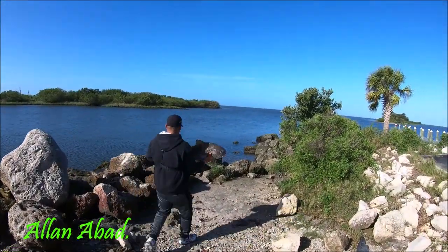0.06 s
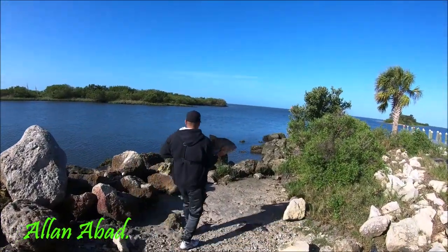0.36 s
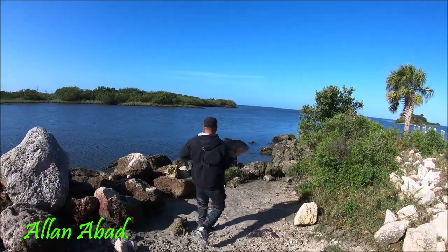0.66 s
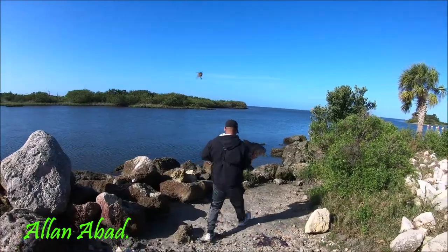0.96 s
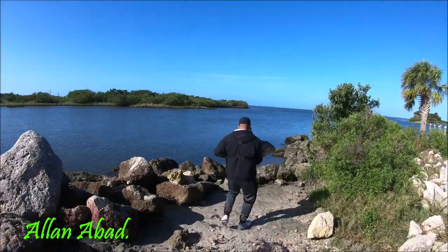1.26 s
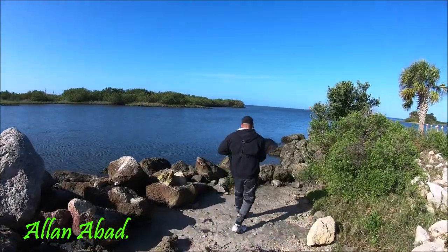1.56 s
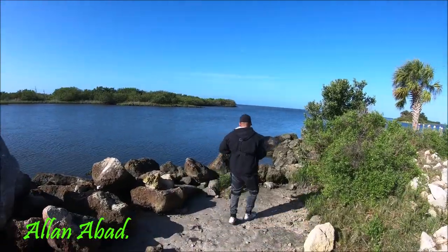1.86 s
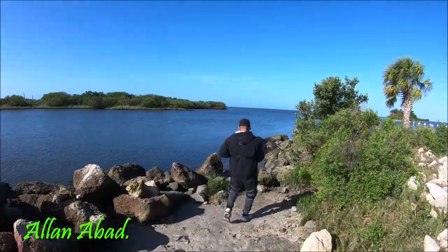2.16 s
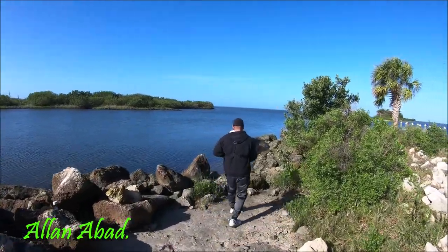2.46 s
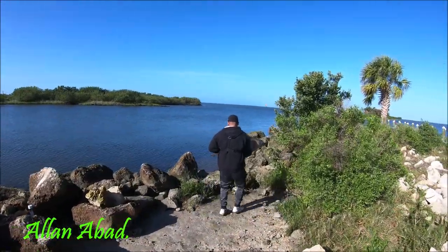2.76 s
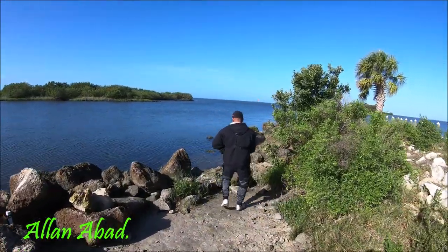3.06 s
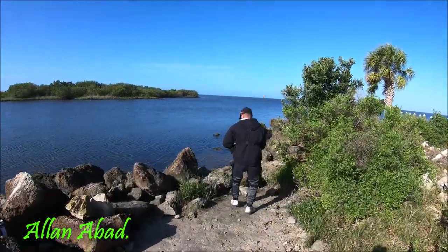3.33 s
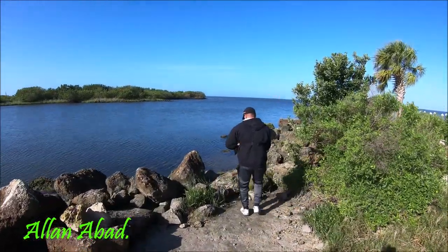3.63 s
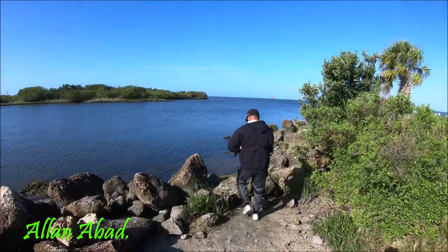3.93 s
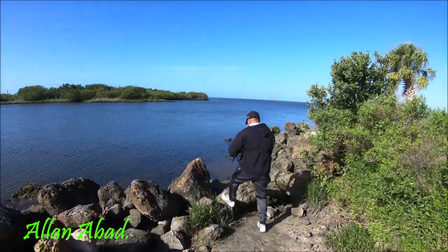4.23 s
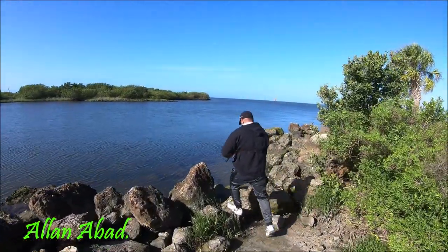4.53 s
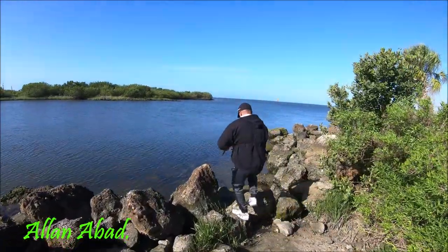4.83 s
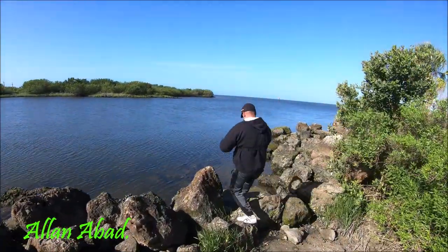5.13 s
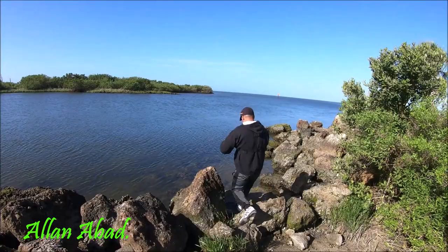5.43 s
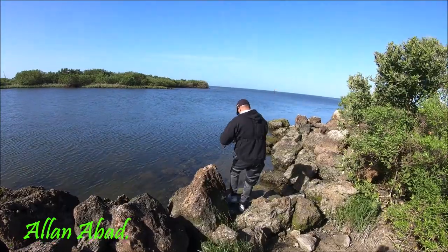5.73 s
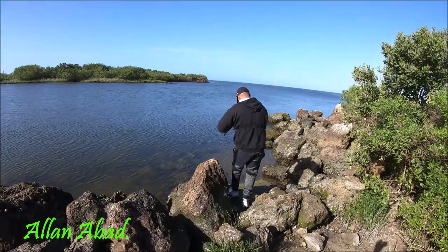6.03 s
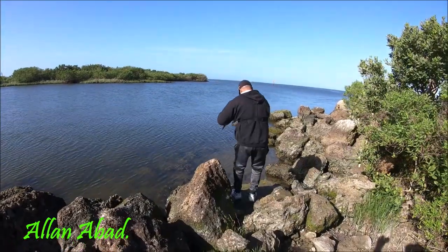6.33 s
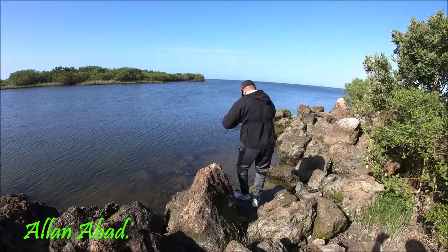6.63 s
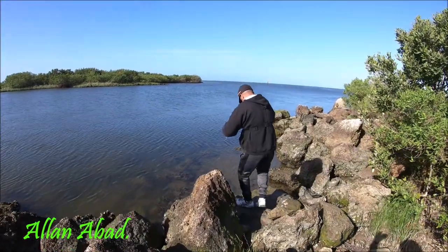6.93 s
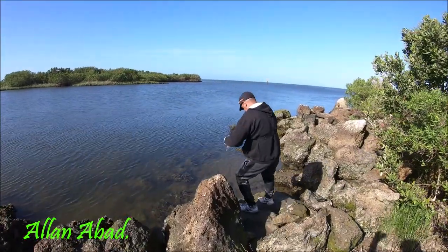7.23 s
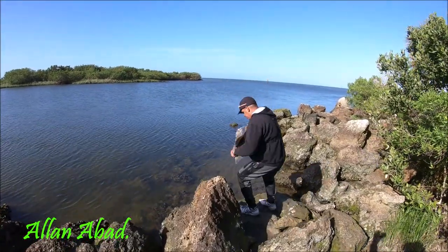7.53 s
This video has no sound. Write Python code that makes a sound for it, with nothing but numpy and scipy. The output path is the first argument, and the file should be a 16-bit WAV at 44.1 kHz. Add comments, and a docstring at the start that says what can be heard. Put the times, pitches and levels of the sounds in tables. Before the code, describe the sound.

Outdoors on an open shore, wind rumbles and flutters on the microphone in uneven gusts, over a soft, steady hiss of water and leaves. Footsteps begin at once with a sharp stone click and crunching grit, and carry on irregularly through the first second. Just after 2 seconds the sound cuts out for an instant. Between about 2.5 and 3 seconds comes a cluster of dull sole knocks, scuffs and clicking stones. From around 3.5 seconds clothing rustles faintly, and a metal zip pull tinkles near 3.8 seconds, then more lightly a few times later. The wind thumps hardest from 4 to 4.5 seconds and gusts again around 6. The steps become sparser and softer on the rock, with muffled bumps near 6.7 seconds. From about 7 seconds a distant low motor swells, and a last stone click comes at around 7.6 seconds.

```python
"""An open shore, one hand-held microphone close behind a walking man. From the first step grit crunches
and stones click under his shoes, while gusts buffet the microphone and water and bushes hiss behind.
Near 2 s the sound cuts out for an instant. His soles knock onto rock, and as he climbs his clothing
rustles and a metal zip pull tinkles; the wind hits hardest around 4 s. At the end a far motor swells."""
import sys
import numpy as np
from scipy import signal
from scipy.fft import rfft, irfft, next_fast_len
from scipy.io import wavfile
from scipy.ndimage import uniform_filter1d, map_coordinates

SR = 44100
rng = np.random.default_rng(int(sys.argv[2]) if len(sys.argv) > 2 else 0)


def dump(signal):
    """Clip the signal to [-1, 1] and save it as 16-bit WAV at the path in sys.argv[1]."""
    limited = np.clip(np.atleast_2d(signal).T, -1, 1)
    pcm = np.round(limited * 32767).astype(np.int16)
    wavfile.write(sys.argv[1], SR, pcm)


N = 339129


def amp(db):
    """Decibels to gain."""
    return 10 ** (np.asarray(db) / 20)


def unit(x):
    """Scale to rms 1."""
    return x / np.sqrt(np.mean(x ** 2) + 1e-20)


def power(x, seconds):
    """Running mean square."""
    return np.abs(uniform_filter1d(x ** 2, max(1, int(seconds * SR)))) + 1e-20


def peak_rms(x, seconds):
    """The rms of a sound's loudest moment."""
    return np.sqrt(power(x, seconds).max())


def curve(points):
    """One value per sample, on straight lines between (time_s, value) points."""
    return np.interp(np.arange(N) / SR, *np.transpose(points))


def wobble(rate, count=N):
    """A smooth random curve, rate knots a second."""
    knots = rng.standard_normal(int(count * rate / SR) + 4)
    return map_coordinates(knots, [np.arange(count) * rate / SR])


def swell(start_s, length_s, attack_s, release_s):
    """A gain that rises from start_s, holds to the end of its length, then dies away."""
    t = np.arange(N) / SR - start_s
    return np.clip(t / attack_s, 0, 1) * np.exp(-np.clip((t - length_s) / release_s, 0, 20))


def colour(x, points):
    """Causal filter whose gain follows (freq_hz, gain_db) points."""
    size = 2 * next_fast_len(len(x) // 2 + 4096)
    hz, db = np.transpose(points)
    gain = amp(np.interp(np.log(np.fft.rfftfreq(size, 1 / SR) + 1), np.log(hz), db))
    cepstrum = irfft(np.log(gain + 1e-6), size)
    cepstrum[1:size // 2] *= 2  # folded onto positive time: minimum phase
    cepstrum[size // 2 + 1:] = 0
    return irfft(rfft(x, size) * np.exp(rfft(cepstrum)), size)[:len(x)]


def noise(points, count=N):
    """Coloured noise of rms 1."""
    return unit(colour(rng.standard_normal(count), points))


def crackle(count, rate, spread_db):
    """Random tiny snaps of uneven size, rate a second."""
    snaps = rng.random(count) < rate / SR
    size = np.minimum(rng.exponential(size=count), 3)
    sign = rng.choice([-1, 1], count)
    return snaps * sign * amp(spread_db * size)


def add(track, start_s, sound):
    """Mix a sound into the track from start_s."""
    start = round(start_s * SR)
    part = sound[max(0, -start):max(0, N - start)]
    track[max(0, start):][:len(part)] += part


def gravel(gain_db=-3, clump_db=4):
    """Grit underfoot: countless tiny fractures in shallow clumps, only while weight shifts on it."""
    # grit crushed under the shoes: start_s, length_s, level_db
    crunches = [(0.008, 0.039, -38.5), (0.254, 0.045, -48.5), (0.327, 0.059, -45), (0.395, 0.17, -55),
                (0.56, 0.075, -50.5), (0.671, 0.054, -48.5), (1.081, 0.018, -47.5), (2.096, 0.27, -59),
                (2.593, 0.071, -49.5), (2.68, 0.039, -52), (3.495, 0.2, -56), (3.834, 0.018, -48),
                (3.993, 0.018, -50.5), (4.18, 0.084, -56), (4.604, 0.019, -53), (6.995, 0.04, -58)]
    # spectrum of breaking grit: freq_hz, gain_db
    grit_spectrum = [(250, -4.5), (700, 9.5), (1600, 3.5), (3500, 7.5), (5000, 4), (6500, -2), (8400, -5),
                     (10500, -14), (12000, -24.5), (15000, -51)]
    weight = sum(amp(db) * swell(start_s, length_s, attack_s=.0064, release_s=.014)
                 for start_s, length_s, db in crunches)
    grains = crackle(N, rate=3500, spread_db=4.5)
    clumps = amp(clump_db * np.tanh(wobble(110)))
    return amp(gain_db) * weight * unit(colour(grains * clumps, grit_spectrum))


def scuffs():
    """A sole grinds over the grit: a short swell of dense grains in a broad band."""
    # twists of a sole: middle_s, width_s, level_db, centre_hz
    twists = [(0.017, 0.023, -44, 8300), (0.029, 0.021, -42, 1680), (0.374, 0.11, -45.5, 1000),
              (0.361, 0.1, -53, 2270), (0.356, 0.11, -59.5, 9000), (0.574, 0.0077, -46.5, 5000),
              (0.601, 0.017, -45.5, 4940), (0.603, 0.015, -49, 8560), (0.601, 0.035, -48, 1200),
              (0.693, 0.022, -38.5, 1430), (2.176, 0.012, -49, 3040), (2.291, 0.067, -50.5, 1870),
              (2.591, 0.017, -42, 4300), (2.61, 0.011, -37, 4400), (2.629, 0.13, -45.5, 580),
              (2.653, 0.016, -44, 3000), (2.699, 0.0073, -37.5, 4800), (2.766, 0.015, -47, 2300),
              (2.851, 0.016, -47, 3120), (3.565, 0.035, -54, 2620), (3.656, 0.039, -47.5, 1400),
              (3.856, 0.02, -60, 1400), (3.97, 0.039, -53.5, 2050), (4.207, 0.074, -52.5, 2100),
              (5.528, 0.034, -46.5, 1520), (6.429, 0.057, -52, 1590), (7.607, 0.04, -56, 3870),
              (7.65, 0.016, -47.5, 2700), (7.659, 0.04, -63, 5000)]
    out, t = np.zeros(N), np.arange(-SR // 5, SR // 5) / SR
    for middle_s, width_s, db, hz in twists:
        band = [(hz / 6, -24), (hz * .4, -9), (hz * .7, -1), (hz * 1.05, 0), (hz * 1.4, -12),
                (hz * 3, -36), (hz * 15, -90)]
        grains = unit(colour(crackle(len(t), rate=3000, spread_db=4), band))
        add(out, middle_s + t[0], amp(db) * grains * np.exp(-2 * (t / width_s) ** 2))
    return colour(out, [(9500, -1.5), (12000, -18.5), (15000, -35)])


def stones(gain_db=-6, ring_db=7, lead_in_db=-13, shed_db=-11.5):
    """A stone click: a few milliseconds of rising noise, a sharp snap with a short ring, a gritty tail."""
    # stones snapping against each other: time_s, level_db, body_db, edge_db, pitch_hz
    clicks = [(0.024, -16.5, 6, 4.5, 3100), (0.0408, -32.5, 5, -2, 1550), (0.11, -45, 8.5, -3, 1400),
              (0.189, -44.5, 8, -19, 2210), (0.2923, -39, 11, -2, 3530), (0.337, -35.5, 3, -12, 4100),
              (0.46, -42.5, -4, -9, 4900), (0.536, -42, 6, -20, 3100), (0.6026, -27.5, 6, -9, 3940),
              (0.688, -40, 8, 1, 1630), (0.691, -40, -2, -10, 3100), (0.72, -30.5, -6, -13, 4260),
              (0.751, -36, 3, -13, 5040), (1.091, -45, 4, -9, 4650), (1.6617, -45.5, 5.5, -9, 1630),
              (2.176, -42, -12, -12, 3270), (2.3014, -41, 2, -23, 2070), (2.555, -33.5, 7, -15.5, 2230),
              (2.5904, -23.5, -5, -25, 3080), (2.609, -36, -7, -21, 3360), (2.616, -41, -15, -10, 4500),
              (2.6352, -27, 5, -18, 3020), (2.698, -34.5, -6, -21, 5200), (2.7035, -49, -7, -12, 4500),
              (2.7448, -41.5, 6, -26, 1380), (2.864, -39.5, 6, -17, 3100), (3.141, -36.5, 4, -15, 3320),
              (3.5352, -42, 8, -7, 7000), (3.661, -39, 4, -20, 2400), (4.5299, -33.5, 9, -12, 2350),
              (4.6297, -45, 1, -9, 5000), (4.754, -45.5, -3, -13, 4000), (5.068, -44, 3, -7, 8300),
              (5.128, -43.5, 0, -24, 2980), (5.958, -46.5, -2, -9, 2670), (6.1608, -44.5, 9.5, -10, 1100),
              (7.461, -53, -8, -1, 7000), (7.646, -38.5, 12, -22, 3000)]
    # the band that sets a stone's loudness: freq_hz, gain_db
    upper_mids = [(1800, -40), (2500, 0), (5500, 0), (7000, -40)]
    out, t = np.zeros(N), np.arange(-SR // 50, SR // 12) / SR
    after = np.maximum(t, 0)
    lead_in = amp(lead_in_db) * np.exp(-np.abs(t) / .003)
    shed = amp(shed_db - 60 * after / .05)  # grit shed by the stone
    for time_s, db, body_db, edge_db, hz in clicks:
        snap = np.interp(db, [-42, -28], [1, 7])  # a light touch only scrapes; a hard one snaps
        t60_s = np.interp(db, [-42, -28], [.014, .006])
        envelope = np.where(t < 0, lead_in, amp(-60 * after / t60_s) + shed)
        force = envelope * rng.standard_normal(len(t)) + snap * (t == 0)
        spectrum = [(150, -20), (600, body_db - 7), (1350, body_db - 2.5), (1700, body_db + 4),
                    (2150, 3.5), (2650, 1.5), (3150, 4), (3900, 1), (4900, -1),
                    (6000, edge_db / 2 - 4.5), (7300, edge_db - 5.5), (8500, edge_db + 2),
                    (10000, edge_db - 8), (12000, edge_db - 31), (15000, edge_db - 47.5)]
        resonance = [(hz / 1.45, 0), (hz, ring_db), (hz * 1.35, 0)]
        click = colour(colour(force, spectrum), resonance)
        loudness = peak_rms(colour(click, upper_mids), .002)
        add(out, time_s + t[0] + .001, amp(db + gain_db) * click / loudness)
    return out


def sole_knocks(gain_db=-2, ring_db=-4):
    """A shoe lands: a dull, dry tap with a faint damped ring."""
    # landings on packed ground and rock: start_s, level_db, pitch_hz
    landings = [(0.024, -46, 335), (0.042, -38, 1010), (0.602, -29.5, 435), (0.689, -42, 600),
                (0.723, -38.5, 477), (1.567, -36.5, 587), (2.171, -31, 590), (2.18, -34.5, 494),
                (2.309, -37, 610), (2.557, -24.5, 196), (2.6093, -24.5, 466), (2.636, -30, 750),
                (2.649, -30.5, 387), (2.659, -24.5, 353), (2.686, -33, 820), (2.746, -36.5, 487),
                (2.945, -38.5, 755), (2.95, -29, 314), (3.605, -36, 636), (4.972, -34.5, 560),
                (5.427, -39.5, 345), (5.487, -30.5, 289), (7.606, -45, 600)]
    out, t = np.zeros(N), np.arange(SR // 8) / SR
    for start_s, db, hz in landings:
        force = rng.standard_normal(len(t)) * amp(-60 * t / .028)
        band = [(hz / 4, -9), (hz, 0), (hz * 1.7, -9), (hz * 3, -27), (hz * 6, -42), (hz * 30, -90)]
        tap = colour(force, band)
        ring = np.sin(2 * np.pi * hz * t) * amp(-60 * t / .02) * (1 - np.exp(-t / .001))
        knock = tap / peak_rms(tap, .004) + amp(ring_db) * ring / peak_rms(ring, .004)
        add(out, start_s, amp(db + gain_db) * knock / peak_rms(knock, .004))
    return out


def sole_bumps(width_s=.0066):
    """A rubber sole eases onto rock: a muffled bump with no edge."""
    # soft steps: middle_s, level_db, pitch_hz
    soft_steps = [(6.626, -41, 397), (6.65, -47, 586), (6.77, -39.5, 393)]
    out, t = np.zeros(N), np.arange(-SR // 25, SR // 25) / SR
    for middle_s, db, hz in soft_steps:
        push = rng.standard_normal(len(t)) * np.exp(-(t / width_s) ** 2)
        band = [(hz / 3, -20), (hz * .8, -3), (hz, 0), (hz * 1.25, -5), (hz * 2, -28), (hz * 8, -80)]
        bump = colour(push, band)
        add(out, middle_s + t[0], amp(db) * bump / peak_rms(bump, .008))
    return out


def turbulence(points, even_s):
    """Airflow: coloured noise whose swells slower than even_s are evened out."""
    flow = noise(points)
    return unit(flow / np.sqrt(uniform_filter1d(power(flow, even_s), SR // 50)))


def wind(rumble_db=1, flutter_db=-2, lump_db=6.5, waver_db=2):
    """Gusts on a wavering breeze hit the microphone: big eddies rumble, small ones flutter in lumps."""
    # the light breeze between gusts: time_s, level_db
    breeze_levels = [(0, -37), (0.95, -32.5), (1.4, -37), (1.75, -35.5), (2.2, -38.5), (2.55, -45.5),
                     (2.75, -43), (3.25, -37), (3.75, -41), (4.72, -46), (5.0, -44.5), (5.6, -35.5),
                     (6.3, -44), (6.95, -45), (7.3, -43), (7.69, -38.5)]
    # gusts on the microphone: start_s, length_s, rumble_db, flutter_db
    gusts = [(0.017, 0.038, -24.5, -43), (0.109, 0.07, -29, -34), (0.218, 0.14, -27.5, -31.5),
             (0.477, 0.078, -22, -30), (0.602, 0.09, -31, -36.5), (0.739, 0.041, -44, -39),
             (0.919, 0.044, -27.5, -36), (1.057, 0.19, -32, -50), (1.29, 0.059, -29, -45),
             (1.594, 0.06, -33.5, -33), (1.751, 0.044, -25, -28), (1.862, 0.084, -24.5, -31),
             (1.968, 0.048, -25, -40), (2.363, 0.078, -32, -32), (2.474, 0.024, -22.5, -54),
             (2.98, 0.2, -25.5, -32.5), (3.305, 0.037, -35, -36), (3.42, 0.18, -32, -30.5),
             (3.904, 0.21, -28, -25.5), (4.144, 0.15, -26.5, -25), (4.311, 0.22, -23.5, -23),
             (4.546, 0.13, -24.5, -33), (4.743, 0.079, -32.5, -63), (5.156, 0.19, -39, -39.5),
             (5.318, 0.041, -39, -19), (5.474, 0.032, -29.5, -28.5), (5.739, 0.099, -35, -28.5),
             (5.857, 0.088, -37.5, -35.5), (5.999, 0.087, -25.5, -25), (6.111, 0.019, -23.5, -29),
             (6.378, 0.022, -23, -37), (6.448, 0.061, -28, -32), (6.536, 0.098, -34, -60)]
    # spectrum of the big, slow eddies: freq_hz, gain_db
    rumble_spectrum = [(10, -11), (25, -4.5), (55, 0), (90, -4), (130, -12), (250, -29.5), (600, -99.5),
                       (2000, -120)]
    # spectrum of the small, quick eddies: freq_hz, gain_db
    flutter_spectrum = [(50, -42), (110, 0.5), (175, 3.5), (260, -6.5), (450, -18.5), (800, -38),
                        (1600, -51), (4000, -96), (8000, -120)]
    breeze = amp(curve(breeze_levels) + waver_db * wobble(9.9))
    rumble_gain, flutter_gain = breeze, amp(-5.5) * breeze
    for start_s, length_s, low_db, high_db in gusts:
        gust = swell(start_s, length_s, attack_s=.014, release_s=.023)
        rumble_gain = np.hypot(rumble_gain, amp(low_db) * gust)
        flutter_gain = np.hypot(flutter_gain, amp(high_db) * gust ** .92)
    rumble = turbulence(rumble_spectrum, even_s=.17)
    lumps = amp(lump_db * wobble(45))
    flutter = unit(lumps * turbulence(flutter_spectrum, even_s=.031))
    return amp(rumble_db) * rumble_gain * rumble + amp(flutter_db) * flutter_gain * flutter


def wind_slaps(gain_db=-6, rise_s=.0069, rasp_gain_db=-.5):
    """A strong eddy bursts on the microphone port: a few ragged low cycles with a rasp above them."""
    # strong eddies: time_s, level_db, centre_hz, rasp_db
    eddies = [(0.243, -20, 188, -22), (0.309, -21.5, 116, -28), (0.401, -17.5, 146, -12),
              (0.532, -13.5, 149, -18), (0.773, -26.5, 200, -15), (0.847, -26, 170, -29),
              (1.067, -24.5, 233, -10), (1.095, -18, 122, -35), (1.167, -16, 121.4, -21.5),
              (1.192, -16.5, 147, -43), (1.247, -20, 187, -25), (1.295, -19, 132, -45),
              (1.774, -16, 65, -30), (1.894, -15, 101, -8.5), (1.922, -16, 208, -9),
              (2.393, -12.5, 164, -20.5), (3.009, -14, 196, -22), (3.149, -24.5, 155, -21),
              (3.418, -16, 160, -30), (3.487, -15, 125, -20), (3.534, -18.5, 188, -19),
              (3.564, -21, 203, -14.5), (3.914, -19, 163, -30), (3.947, -12, 142, -29),
              (3.991, -9, 162, -12), (4.011, -14.5, 185, -9.5), (4.043, -19.5, 119, -7.5),
              (4.099, -18.5, 191, -21), (4.21, -14.5, 190, -12.5), (4.322, -10.5, 131, -24),
              (4.392, -4, 110, -13), (4.428, -16, 134, -8.5), (4.456, -12.5, 99, -26),
              (4.494, -10, 127, -10), (4.571, -13.5, 105, -28), (5.33, -14.5, 187, -27),
              (5.747, -13, 164, -29), (6.023, -11.5, 166, -26), (6.048, -12, 176, -11),
              (6.064, -12.5, 133, -33), (6.118, -16, 217.5, -25), (6.132, -17.5, 302, -13.5)]
    rasp_spectrum = [(200, -13), (450, 9.5), (700, -5), (1000, -12.5), (1700, -27), (4000, -49),
                     (10000, -120)]
    out, t = np.zeros(N), np.arange(SR // 8) / SR
    envelope = t / rise_s * np.exp(1 - t / rise_s)
    fade = 1 - t / t[-1]
    for time_s, db, hz, rasp_db in eddies:
        pitch_hz = hz * 2 ** (.5 * np.tanh(wobble(230, len(t))))
        size = amp(4 * np.tanh(wobble(260, len(t))))
        thump = envelope * size * np.sin(2 * np.pi * (np.cumsum(pitch_hz) / SR + rng.random()))
        rasp = colour(rng.standard_normal(len(t)) * envelope * size, rasp_spectrum)
        burst = thump / peak_rms(thump, .01) + amp(rasp_db + rasp_gain_db) * rasp / peak_rms(rasp, .01)
        add(out, time_s - .002, amp(db + gain_db) * burst * fade)
    return out


def zip_pull(gain_db=-3, scrape_db=-11, bounce_loss_db=13):
    """Each swing strikes the loose metal tab, which bounces twice; its scraping blurs the modes."""
    # strikes on the tab: start_s, level_db, tilt_db_per_octave
    tinkles = [(1.284, -63, -8), (3.781, -41.5, 11), (3.7915, -45, 9), (3.93, -65, 16), (4.299, -69, -12),
               (4.905, -69, -22), (4.975, -68, -8), (5.32, -72, -8), (5.511, -56.5, 2), (5.524, -62, 0),
               (5.645, -76, 0), (6.0402, -63, 0), (6.0801, -70, -10), (6.519, -71, 4), (6.648, -72, 6),
               (6.7655, -72, -7), (6.9311, -60, -3)]
    # modes of the tab: freq_hz, level_db, t60_s
    modes = [(6400, 3, 0.06), (9200, -4, 0.04), (9440, 6.5, 0.07), (9900, -10, 0.028), (13140, -16, .08),
             (13260, -10, 0.07), (14580, -22, .08)]
    scrape_spectrum = [(2000, -27), (6500, -4.5), (9500, 2), (11800, -15.5), (13500, -3.5), (15000, -21)]
    out, t = np.zeros(N), np.arange(SR // 6) / SR
    hz, mode_db, t60_s = np.transpose(modes)[:, :, None]
    octaves = np.log2(hz / np.median(hz))
    onset = 1 - np.exp(-t / .003)
    for start_s, db, tilt_db in tinkles:
        for bounce in range(3):
            phase_blur = .07 * np.cumsum(rng.standard_normal((len(modes), len(t))), axis=1)
            strength_db = mode_db + tilt_db * octaves + 3 * rng.standard_normal(hz.shape)
            ring = (amp(strength_db - 60 * t / t60_s) * np.sin(2 * np.pi * hz * t + phase_blur)).sum(0)
            scrape = amp(scrape_db - 60 * t / .09) * noise(scrape_spectrum, len(t))
            touch_s = start_s + bounce * rng.uniform(.0045, .0072)
            add(out, touch_s, amp(db + gain_db - bounce_loss_db * bounce) * (ring + scrape) * onset)
    return out


def clothing(gain_db=-2):
    """Stiff fabric crackles with each reach and stride as a fold buckles, then relaxes."""
    # creases: start_s, length_s, level_db
    creases = [(1.278, 0.03, -65), (3.47, 0.11, -67), (3.622, 0.06, -68), (3.769, 0.12, -64.5),
               (4.003, 0.022, -60.5), (4.126, 0.008, -62), (4.283, 0.044, -66), (4.62, 0.05, -68),
               (4.705, 0.008, -57), (4.737, 0.029, -58.5), (4.773, 0.06, -65), (4.971, 0.012, -60),
               (5.058, 0.029, -59.5), (5.303, 0.025, -64.5), (5.49, 0.072, -65), (5.578, 0.007, -63),
               (5.954, 0.014, -64), (6.03, 0.12, -67.5), (6.416, 0.027, -61), (6.927, 0.018, -67),
               (7.592, 0.02, -67)]
    # spectrum of creasing fabric: freq_hz, gain_db
    cloth_spectrum = [(1500, -20), (3500, -3), (5200, -2.5), (6500, -1.5), (8300, 1.5), (9500, -10),
                      (11000, -14), (13000, -22.5), (15000, -36)]
    folding = sum(amp(db) * swell(start_s, length_s, attack_s=.0033, release_s=.006)
                  for start_s, length_s, db in creases)
    rustle = unit(colour(crackle(N, rate=5500, spread_db=5.5), cloth_spectrum))
    return amp(gain_db) * folding * rustle


def shore(gain_db=1, waver_db=1):
    """Ripples and leaves behind the walker blend into a slightly wavering hiss."""
    # loudness of water and leaves: time_s, level_db
    hiss_levels = [(0.0, -48), (0.6, -49), (0.9, -51), (2.55, -51), (2.9, -48.5), (3.28, -52), (3.7, -51),
                   (4.72, -52.5), (5.05, -52), (5.5, -51), (5.8, -53), (6.83, -54), (7.13, -51.5),
                   (7.32, -54), (7.69, -52.5)]
    # spectrum of their hiss: freq_hz, gain_db
    hiss_spectrum = [(100, 13), (300, 3.5), (550, 8), (1000, 3.5), (1800, 3.5), (2500, -1.5), (3400, 0.5),
                     (4500, -6.5), (5600, -14.5), (7000, -16.5), (8700, -18.5), (10200, -30.5),
                     (12000, -41), (15000, -69.5)]
    return amp(curve(hiss_levels) + gain_db + waver_db * wobble(14)) * noise(hiss_spectrum)


def far_motor(gain_db=-1):
    """A motor far off: low, narrow bands of noise that throb under the hiss."""
    # loudness of the motor: time_s, level_db
    motor_levels = [(0, -62.5), (2.85, -46), (3.75, -61), (6.3, -62), (6.9, -39), (7.1, -48), (7.22, -38.5),
                    (7.69, -38)]
    # spectrum of its drone: freq_hz, gain_db
    drone_spectrum = [(80, -36.5), (125, -13.5), (158, 5), (178, -8), (195, -0.5), (220, -12), (380, -23.5),
                      (700, -41), (2000, -74.5), (6000, -120)]
    return amp(curve(motor_levels) + gain_db) * noise(drone_spectrum)


def scene():
    """Open air with no echo, heard by one microphone."""
    buffeting = wind() + wind_slaps()
    footsteps = gravel() + scuffs() + stones() + sole_knocks() + sole_bumps()
    return (buffeting + footsteps + clothing() + zip_pull() + shore() + far_motor())[None]


def record(dry, ceiling=.36, gap_start_s=2.062, gap_end_s=2.087, top_hz=15600):
    """The strongest gusts are rounded off, the sound drops out once, and the top is cut."""
    rounded = dry / (1 + np.abs(dry / ceiling) ** 6) ** (1 / 6)
    t = np.arange(N) / SR
    live = (t < gap_start_s) | (t > gap_end_s)
    gate = uniform_filter1d(live.astype(float), SR // 1000)
    lowpass = signal.butter(16, top_hz, fs=SR, output="sos")
    return signal.sosfilt(lowpass, rounded * gate)


dry = scene()
out = record(dry)
dump(out)
```